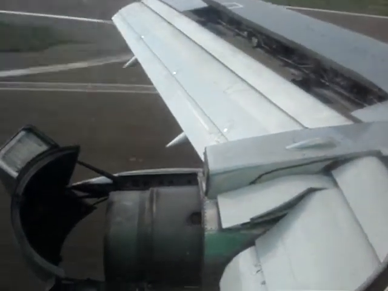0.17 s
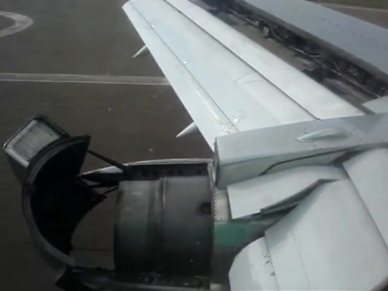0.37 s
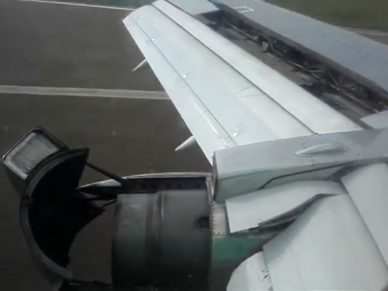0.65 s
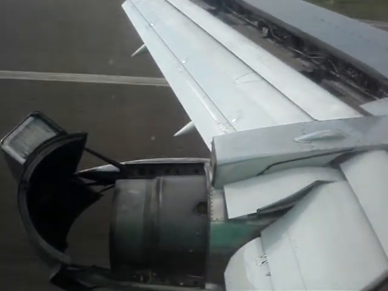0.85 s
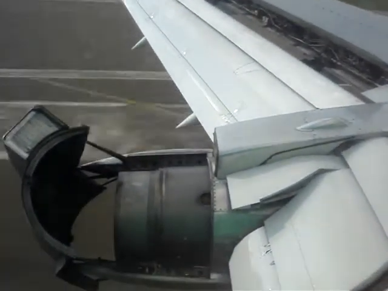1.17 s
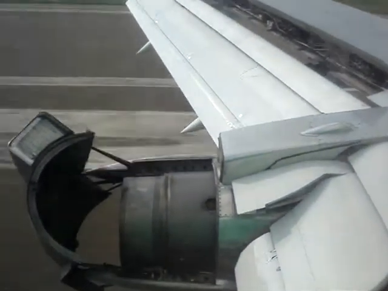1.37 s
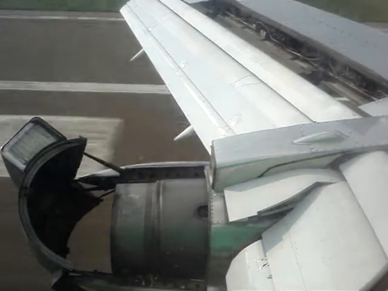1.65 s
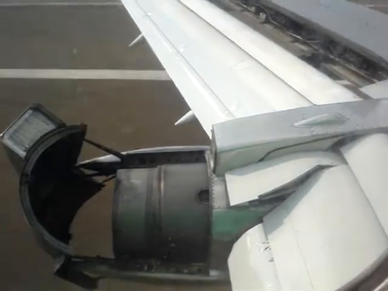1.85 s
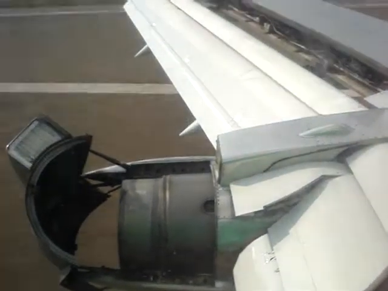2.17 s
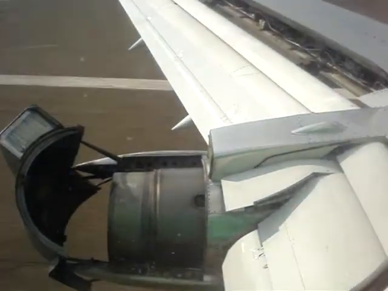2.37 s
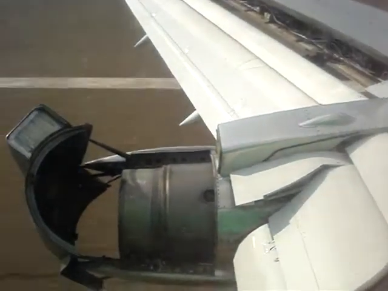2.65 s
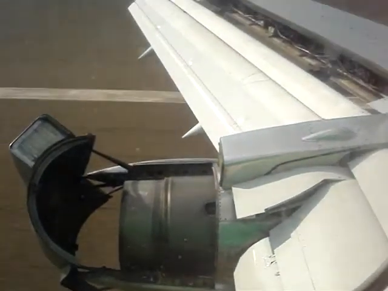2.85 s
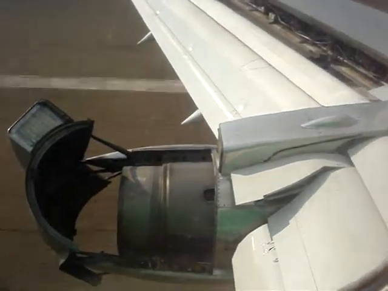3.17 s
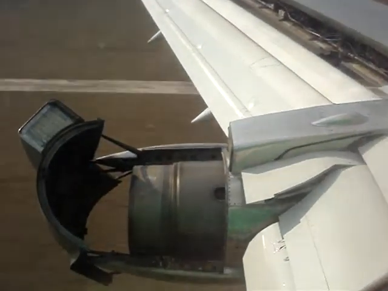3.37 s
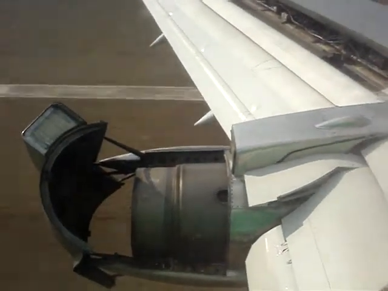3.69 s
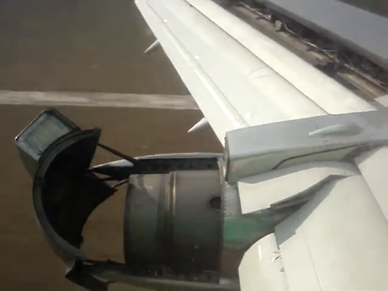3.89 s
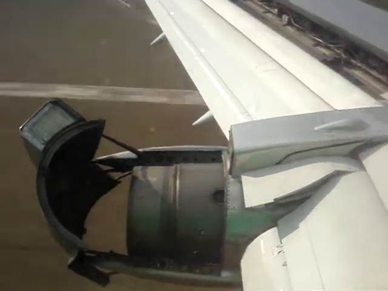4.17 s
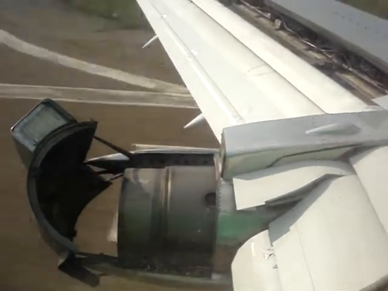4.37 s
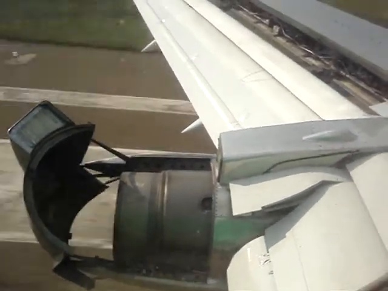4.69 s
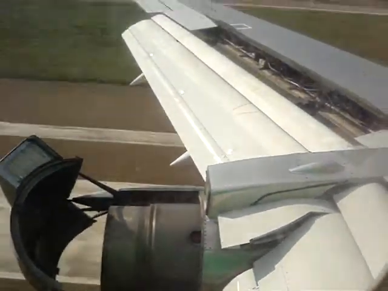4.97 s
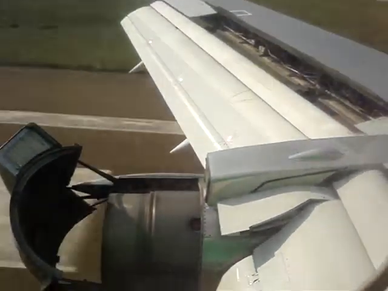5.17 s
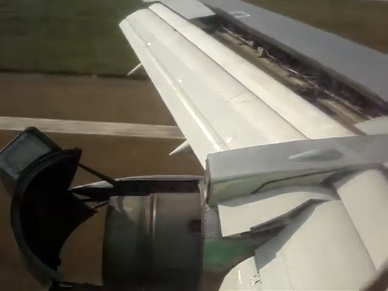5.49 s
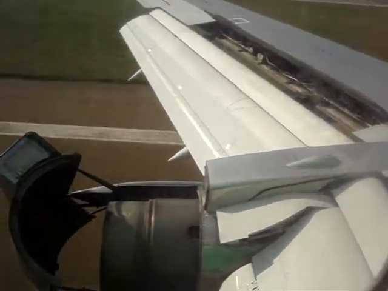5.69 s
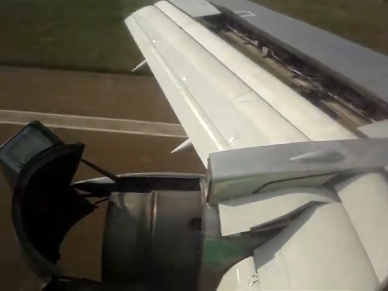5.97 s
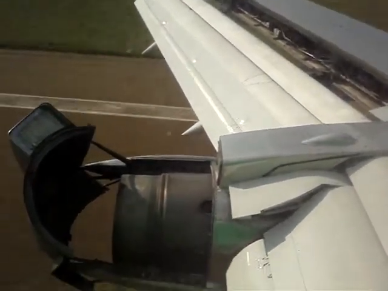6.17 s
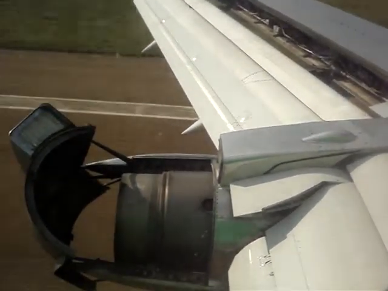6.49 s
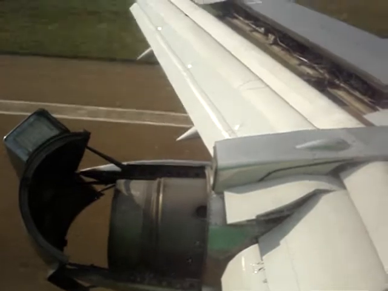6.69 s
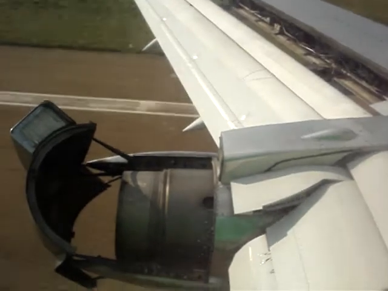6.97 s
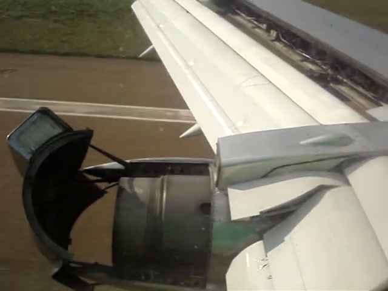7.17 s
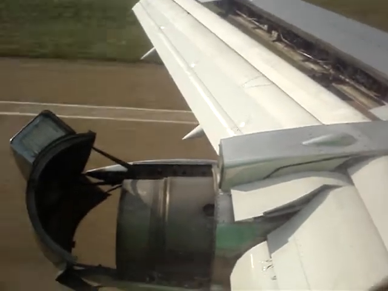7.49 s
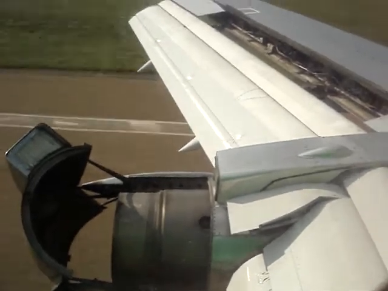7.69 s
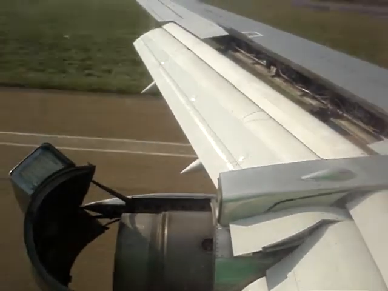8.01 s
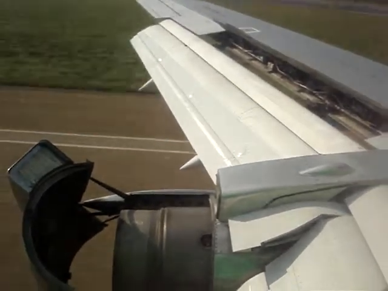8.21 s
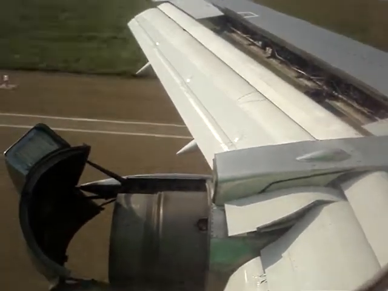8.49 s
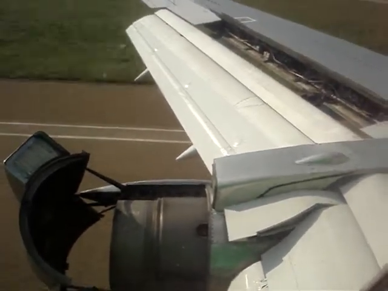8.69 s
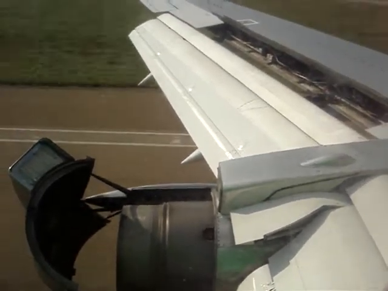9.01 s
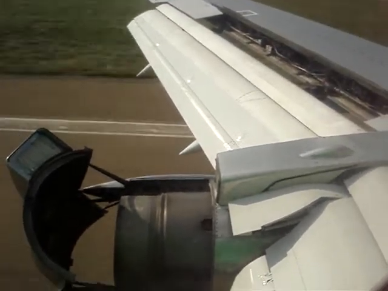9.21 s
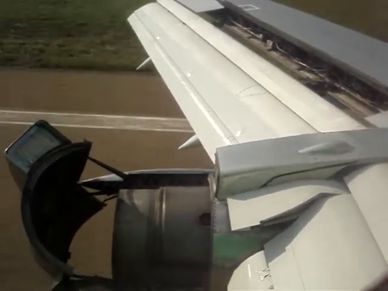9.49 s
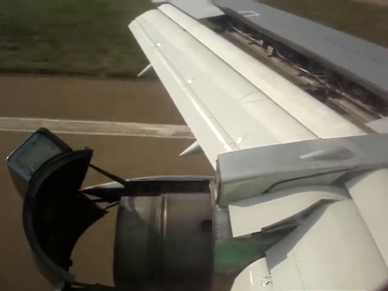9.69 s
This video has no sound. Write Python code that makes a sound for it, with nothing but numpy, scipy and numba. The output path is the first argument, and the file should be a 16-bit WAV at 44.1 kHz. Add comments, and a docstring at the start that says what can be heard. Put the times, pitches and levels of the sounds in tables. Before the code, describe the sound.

Airliner braking on the runway with reverse thrust, heard from a window seat: heavy muffled engine roar, air rush, chattering plastic panels and sharp knocks.

```python
"""A window seat in an airliner braking on the runway, close beside an engine with its thrust reverser open.
From the start jet noise booms through the fuselage, air rushes along the skin and wheels rumble below.
Trim panels chatter in dense scrapes, harder with each jolt; from 0.6 s a loose panel adds single knocks.
Around 6.5 s the thrust eases: roar, rush and chatter drop, single ticks stand out and the rumble rises.
At the microphone a fast limiter senses upward crests, hard rails clip the rest, and the top is cut."""
import sys
import numpy as np
from scipy import signal
from scipy.fft import rfft, irfft
from scipy.io import wavfile
from scipy.ndimage import uniform_filter1d
from numba import njit

SR = 44100
rng = np.random.default_rng(int(sys.argv[2]) if len(sys.argv) > 2 else 0)


def store_pcm(level_fs):
    """Save levels as 16-bit WAV."""
    pcm = np.round(np.clip(level_fs, -1, 1) * 32767).astype(np.int16)
    wavfile.write(sys.argv[1], SR, np.atleast_2d(pcm).T)


N = 434384
TIME = np.arange(N) / SR  # s
FREQS = np.fft.rfftfreq(N, 1 / SR)  # Hz

# jet roar as the fuselage wall lets it through: frequency_hz, relative_density_db (per Hz)
ROAR_SPECTRUM = [(20, -29.5), (55, -28), (80, -19), (115, -10), (165, -3.5), (300, -1), (370, -5.5),
                 (500, -11.5), (650, -18), (850, -24), (1300, -33), (1700, -35), (4000, -70)]
# peaks and dips of wall and cabin air at the seat: centre_hz, width_hz, height_db
CABIN_MODES = [(175, 17, 2.5), (222, 40, 5.5), (249.9, 10.3, -10.5), (268, 20, -1), (350, 23, 3),
               (489, 34, 2), (621, 40, 1.5), (1110, 87, 2), (1340, 120, 3.5), (1540, 30, 4), (2050, 210, 6),
               (2550, 130, 4.5)]
# air rushing along the skin: frequency_hz, relative_density_db (per Hz)
RUSH_SPECTRUM = [(300, -14.5), (550, 1), (750, -2), (1000, -3.5), (1350, -7), (1750, -14), (2300, -14),
                 (2800, -18.5), (3500, -19), (6000, -36.5), (10000, -48)]
# wheel rumble through the floor: frequency_hz, relative_density_db (per Hz)
WHEEL_SPECTRUM = [(25, -3.5), (55, -4), (85, 7), (160, -9.5), (500, -42.5)]
# loose trim panels, each with its own ring: ring_hz, width_hz, relative_level_db
TRIM_PANELS = [(1410, 1300, -7), (2100, 580, -4.5), (2600, 630, -2), (3136, 740, -5), (4110, 1420, -5),
               (5480, 1780, -5), (7640, 2770, -10)]
# jolts of the airframe that set the trim chattering harder: crest_s, rise_db, length_s (at half the rise)
AIRFRAME_JOLTS = [(0.087, 4, 0.097), (0.633, 4, 0.27), (0.996, 4, .16), (1.635, 3.5, .16),
                  (1.886, 4.5, 0.099), (2.037, 1.5, 0.08), (2.235, 4, 0.11), (2.435, 2, 0.15),
                  (2.573, 2.5, 0.071), (2.758, 3, 0.076), (2.877, 4.5, .07), (3.18, 5.5, 0.069),
                  (3.486, 1.5, 0.089), (3.701, 3.5, 0.068), (3.873, 2.5, .16), (4.085, 5.5, 0.069),
                  (4.267, 3, 0.047), (4.525, 4, .11), (4.702, 4, 0.08), (4.938, 5, 0.088),
                  (5.174, 1, 0.049), (5.782, 3, .06), (5.958, 5.5, .09), (6.064, 3, 0.11), (6.953, 5, .1),
                  (7.403, 4.5, 0.055), (7.998, 1.5, 0.086), (8.262, 2, 0.048), (8.84, 2, .05),
                  (9.543, 2, .06)]
# single knocks of a loose panel: start_s, peak_db (before the knock trim), ring_hz
PANEL_KNOCKS = [(0.601, -30, 2620), (1.7418, -11.5, 2570), (1.8844, -14, 2520), (2.0432, -11, 2500),
                (2.573, -11.5, 3000), (2.8838, -20, 3170), (3.1711, -12, 2550), (3.8024, -10, 2020),
                (3.9942, -16, 2650), (4.0651, -14, 2050), (4.2521, -12, 2630), (4.8712, -10.5, 2440),
                (4.9394, -13, 2720), (5.1795, -12.5, 2380), (5.8196, -18, 3200), (5.9656, -12, 2630),
                (6.9776, -16, 1800), (7.4107, -23, 2960), (7.715, -22.5, 2020), (8.0921, -23, 2040),
                (8.261, -22, 2300), (8.845, -16.5, 2700), (9.5318, -22, 2300)]

# how each source follows the braking, before its own trim: start_db, drift_db_per_s, step_db (as thrust eases)
ROAR_BRAKING = (-13, -0.054, -1.2)
RUSH_BRAKING = (-24.5, -0.51, -4.5)
WHEELS_BRAKING = (-50.5, .9, 6)
CHATTER_BRAKING = (-33.5, -0.29, -8.5)

EASE_S, EASE_SCALE_S = 6.5, .09  # middle and time scale of the smooth easing of thrust
RUSH_JOLT_SHARE = 0.58  # part of a jolt's dB rise that the rush shares
TOP_HZ = 10000  # upper edge of the recorded band


def undb(db):
    """Convert decibels to an amplitude gain."""
    return 10 ** (np.asarray(db) / 20)


def unit(x):
    """Scale to rms 1."""
    return x / np.sqrt(np.mean(x ** 2))


def colour(x, spectrum, modes=()):
    """Filter by a smooth spectrum with narrow peaks and dips on top, then scale to rms 1."""
    hz, db = np.transpose(spectrum)
    shape_db = np.interp(np.log(FREQS + 1), np.log(hz), db)
    shape_db = shape_db - 40 * np.log10(1 + (hz[0] / (FREQS + 1) / 2) ** 2)  # bass roll-off
    for centre_hz, width_hz, height_db in modes:
        shape_db = shape_db + height_db / (1 + (2 * (FREQS - centre_hz) / width_hz) ** 2)
    return unit(irfft(rfft(x) * undb(shape_db), N))


def walk(rate_hz):
    """Smooth random wander of rms 1: noise whose amplitude spectrum has halved at rate_hz."""
    noise = rng.standard_normal(N)
    return unit(irfft(rfft(noise) / (1 + (FREQS / rate_hz) ** 2), N))


def ring(x, hz, width_hz):
    """Ring a damped resonance with steep skirts, as a band-pass filter."""
    edges_hz = hz * np.exp(np.array([-1, 1]) * width_hz / hz / 2)
    edges_hz = np.minimum(edges_hz, SR / 2 - 1)
    bandpass = signal.butter(2, edges_hz, "bandpass", fs=SR, output="sos")
    return signal.sosfilt(bandpass, x)


def braking(start_db, drift_db_per_s, step_db):
    """Level in dB: a steady drift while the plane slows, and a smooth step when the thrust eases."""
    eased = (1 + np.tanh((TIME - EASE_S) / EASE_SCALE_S / 2)) / 2
    return start_db + drift_db_per_s * TIME + step_db * eased


def roar(level_db, trim_db=2.0):
    """Turbulence of the reversed jet rings the wall and the cabin air."""
    turbulence = rng.standard_normal(N)
    return colour(turbulence, ROAR_SPECTRUM, CABIN_MODES) * undb(level_db + trim_db)


def rush(level_db, trim_db=-1, gust_db=0.2, flutter_db=0.4):
    """Exhaust and airflow scour the skin as noise with slow gusts and a faster flutter."""
    gusts = undb(gust_db * walk(4.7) + flutter_db * walk(70))
    airflow = rng.standard_normal(N) * gusts
    return colour(airflow, RUSH_SPECTRUM, CABIN_MODES) * undb(level_db + trim_db)


def wheels(level_db, bump_db=2.0):
    """The undercarriage rumbles over uneven concrete: low noise with a wandering level."""
    rumble = colour(rng.standard_normal(N), WHEEL_SPECTRUM)
    return rumble * undb(level_db + bump_db * walk(5.5))


def chatter(level_db, trim_db=2.0, shake_db=1.0, bounce_db=2.0, own_db=1.53, scatter_db=2.5,
            contacts_per_s=3000, scrape_s=0.00069, brighten=0.15):
    """Loose panels touch their frames at random; each contact is a tiny scrape that rings the panel."""
    shared_db = shake_db * walk(55) + bounce_db * walk(150)  # the same shaking reaches every panel
    scrape = np.exp(-TIME[:256] / scrape_s)
    hardness_db = level_db - np.median(level_db)
    rattle = 0
    for hz, width_hz, panel_db in TRIM_PANELS:
        touching = rng.random(N) < contacts_per_s / SR
        force_db = shared_db + own_db * walk(55)
        # taking off the mean over an eighth of a second sets hard bounces against lulls
        force_db = force_db - uniform_filter1d(force_db, size=SR // 8)
        force = undb(force_db + scatter_db * rng.standard_normal(N))
        scrapes = signal.oaconvolve(touching * force, scrape)[:N]
        contacts = scrapes * rng.standard_normal(N)
        tilt_db = brighten * hardness_db * np.log(hz / 2500)  # harder contacts are brighter
        rattle = rattle + undb(panel_db + tilt_db) * unit(ring(contacts, hz, width_hz))
    return unit(rattle) * undb(level_db + trim_db)


def jolting():
    """Extra shaking in dB: each jolt of the airframe swells and dies in a bell."""
    return sum(rise_db * .5 ** ((2 * (TIME - crest_s) / length_s) ** 2)
               for crest_s, rise_db, length_s in AIRFRAME_JOLTS)


def knocks(trim_db=-3, decay_s=0.0039, width_hz=900, crack=0.093):
    """A panel slaps its frame: a decaying noise buzz rings it, with some of the raw crack on top."""
    out, age_s = np.zeros(N + 4096), TIME[:4096]
    for start_s, peak_db, hz in PANEL_KNOCKS:
        buzz = rng.standard_normal(len(age_s)) * np.exp(-age_s / decay_s)
        knock = ring(buzz, hz, width_hz) + crack * buzz
        knock = knock / np.abs(knock).max()
        start = int(start_s * SR)
        out[start:start + len(age_s)] += knock * undb(peak_db + trim_db)
    return out[:N]


def scene():
    """Roar, rush, wheel rumble and rattling trim as they meet at the window seat."""
    jolt_db = jolting()
    engine = roar(braking(*ROAR_BRAKING))
    airflow = rush(braking(*RUSH_BRAKING) + RUSH_JOLT_SHARE * jolt_db)
    rumble = wheels(braking(*WHEELS_BRAKING))
    trim = chatter(braking(*CHATTER_BRAKING) + jolt_db) + knocks()
    return (engine + airflow + rumble + trim)[None]


@njit
def follow_peaks(x, attack, release):
    """Envelope that climbs quickly with each crest and sinks back slowly."""
    out, envelope = np.empty(len(x)), 0.
    for i in range(len(x)):
        envelope += (x[i] - envelope) * (attack if x[i] > envelope else release)
        out[i] = envelope
    return out


def record(dry):
    """A fast limiter at the microphone senses only upward swings; hard rails clip what still exceeds them."""
    ceiling, rail = .45, .7  # amplitudes
    attack_s, release_s = .00006, .02
    upward = np.maximum(dry[0], ceiling)
    crest = follow_peaks(upward, 1 - np.exp(-1 / (attack_s * SR)), 1 / (release_s * SR))
    gain = ceiling / np.maximum(crest, ceiling)
    limited = np.clip(dry * gain, -rail, rail)
    top_cut = signal.ellip(12, .2, 80, TOP_HZ, fs=SR, output="sos")  # steep low-pass
    return signal.sosfilt(top_cut, limited)


dry = scene()
out = record(dry)
store_pcm(out)
```